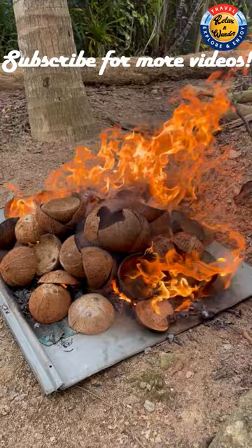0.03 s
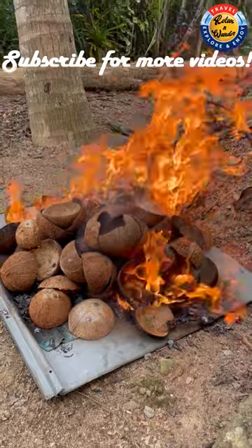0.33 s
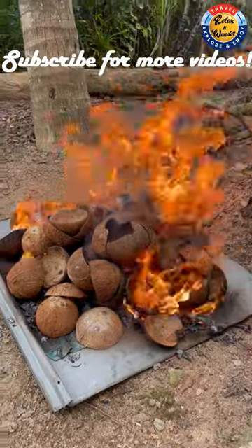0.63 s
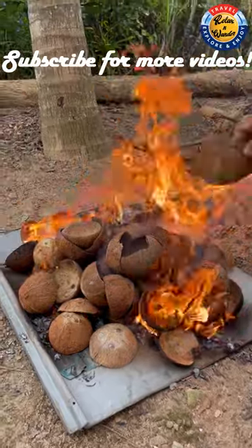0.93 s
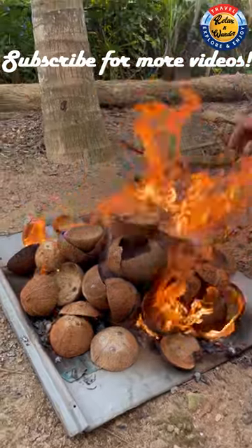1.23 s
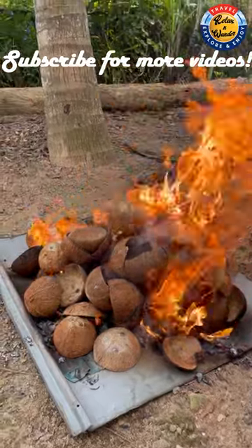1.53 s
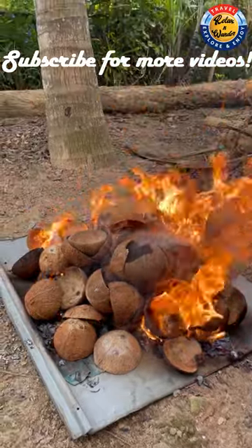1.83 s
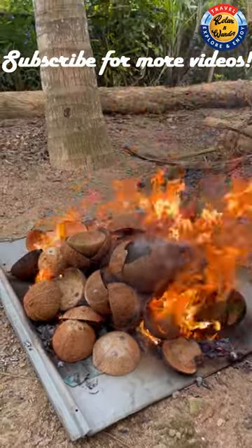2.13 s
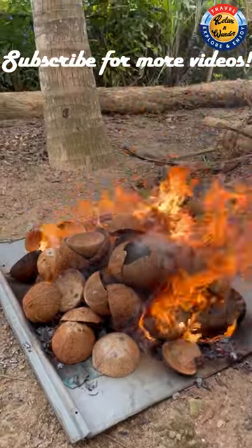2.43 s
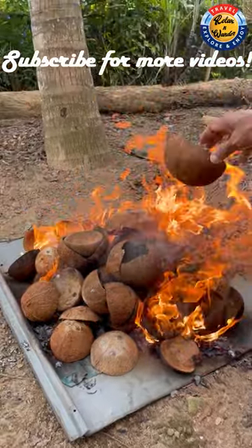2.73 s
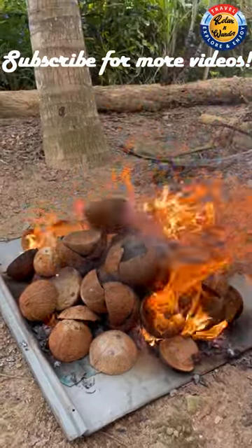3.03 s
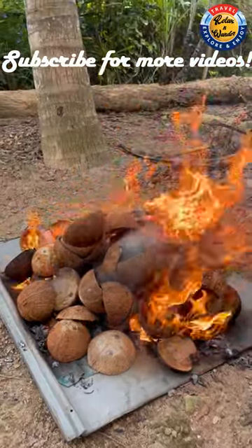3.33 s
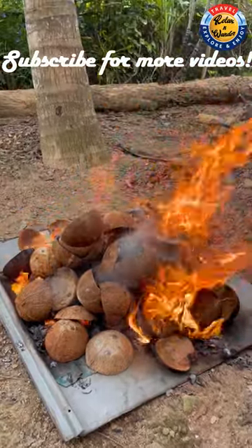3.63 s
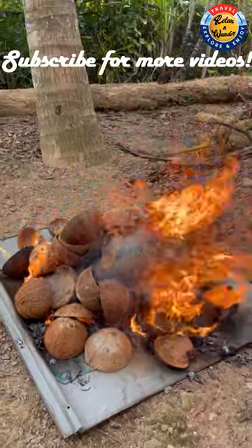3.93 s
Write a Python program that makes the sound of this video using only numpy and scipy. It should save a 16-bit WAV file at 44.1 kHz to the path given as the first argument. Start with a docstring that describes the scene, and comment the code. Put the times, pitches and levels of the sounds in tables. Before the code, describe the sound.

A close outdoor fire rumbles, rushes and crackles for four seconds, with scattered sharp pops. Steam spits briefly around 0.7 seconds. At 1.2 seconds a thrown coconut shell lands with a loud hollow clack and a crunch of embers, settling with dull knocks near 1.6. A second clacks down at 2.9 and knocks again at 3.1. The flames gradually swell, rushing strongest around 3.5 seconds.

```python
"""Coconut shell fire

A heap of coconut shells burns outdoors, close by. Turbulent gas rumbles, rushes and hisses; fibres
crackle, steam spits and pockets of gas pop the hot shells open. Two more half shells are thrown on:
each lands with a hollow clack, crunches the embers and tumbles into place with duller knocking."""
import sys
import numpy as np
from scipy import signal
from scipy.fft import rfft, irfft
from scipy.io import wavfile
from scipy.ndimage import uniform_filter1d

SR = 44100
rng = np.random.default_rng(int(sys.argv[2]) if len(sys.argv) > 2 else 0)


def put_to_file(sound):
    """Save the sound as 16-bit audio at rate SR, in the file named by the first command-line argument."""
    columns = np.atleast_2d(sound).T  # one column per channel
    safe = np.clip(columns, -1, 1)
    whole_steps = np.round(safe * 32767)
    wavfile.write(sys.argv[1], SR, whole_steps.astype(np.int16))


N = 176400


def undb(db):
    """Decibels to gain."""
    return 10 ** (np.asarray(db) / 20)


def unit(x):
    """Scale to rms 1."""
    return x / np.sqrt(np.mean(x ** 2))


def curve(points):
    """Read (freq_hz, value) points at every frequency of the spectrum."""
    hz, value = np.array(points, float).T
    bins_hz = np.arange(N // 2 + 1) * SR / N
    return np.interp(np.log(bins_hz + 1), np.log(hz), value)


def colour(x, points):
    """EQ a sound with (freq_hz, gain_db) points."""
    return irfft(rfft(x) * undb(curve(points)), N)


def band(x, low_hz, high_hz, order):
    """Causal band-pass."""
    return signal.sosfilt(signal.butter(order, [low_hz, high_hz], "band", fs=SR, output="sos"), x)


def wander(rate_hz):
    """Smooth random drift with rms 1."""
    hold = int(SR / rate_hz)
    steps = np.repeat(rng.standard_normal(N // hold + 1), hold)
    return unit(uniform_filter1d(uniform_filter1d(steps, hold), hold)[:N])


def chatter(samples, depth_db=2.8, rate_hz=700):
    """A fast, uneven flutter of level, with rms 1."""
    return unit(undb(depth_db * wander(rate_hz)[:samples]))


def burst(low_hz, high_hz, decay_s, order=2):
    """A fracture: a burst of noise that builds up quickly and dies fast."""
    t = np.arange(SR // 20) / SR
    attack_s = 0.58 * decay_s
    envelope = np.exp(-t / decay_s) * (1 - np.exp(-t / attack_s))
    noise = band(rng.standard_normal(len(t)) * envelope, low_hz, high_hz, order)
    return noise * np.sqrt(decay_s * SR / 2 / np.sum(noise ** 2))


def add(out, start_s, sound):
    """Mix a sound in at a time."""
    i = int(start_s * SR)
    out[i:i + len(sound)] += sound[:N - i]


# Tone of the reflections from ground and trees: freq_hz, gain_db
SCATTER_EQ = [(200, -12), (700, -12.5), (2000, -10.5), (6000, -7), (15000, -19)]


def yard(x, scatter_t60_s=0.098, tail_t60_s=0.98, tail_db=-22.5):
    """Add a quick stereo scatter off the ground and heap, then a faint tail from the trees."""
    t = np.arange(N) / SR
    fade = undb(-60 * t / scatter_t60_s) + undb(tail_db - 60 * t / tail_t60_s)
    mid, side = colour(rng.standard_normal((2, N)), SCATTER_EQ) * fade / np.sqrt(np.sum(fade ** 2))
    echo = mid + .5 * side * np.array([[1], [-1]])
    return x + signal.fftconvolve(x[None], echo, axes=1)[:, :N]


# Swell of the five flame layers, before trim: time_s, rumble_db, roar_db, rush_db, flare_db, sizzle_db
FLAME_SWELL = [(0.06, -43.5, -48, -60, -69, -65.5), (0.52, -39, -48.5, -58.5, -64.5, -60),
               (0.85, -42.5, -49.5, -63.5, -69.5, -65), (1.1, -38, -51, -60, -64.5, -59.5),
               (1.48, -43, -48, -59.5, -72, -61), (1.61, -40.5, -45.5, -56, -61, -57),
               (1.67, -40, -40, -51.5, -62.5, -61), (1.95, -39.5, -44.5, -56.5, -63, -57.5),
               (2.27, -38.5, -43.5, -52, -59.5, -57), (2.42, -39, -42.5, -50, -58.5, -55.5),
               (3.0, -38.5, -41.5, -48.5, -56.5, -58), (3.31, -37, -45, -52.5, -59, -57.5),
               (3.36, -42, -40, -46, -55, -59), (3.49, -34, -42, -43.5, -53.5, -59.5),
               (3.55, -37.5, -41, -50, -61, -60), (3.87, -36.5, -42.5, -49.5, -65.5, -62.5),
               (4.0, -36.5, -47.5, -49, -60.5, -63.5)]
# The layers, rumble to sizzle: low_hz, high_hz, trim_db, flutter_db, flutter_hz, stereo_width
FLAME_LAYERS = [(25, 256, 1, 1.5, 14, 0.02), (260, 875, 1, 2, 25, 0.24), (920, 2490, 1.5, 2.03, 35, 0.23),
                (2510, 4360, 1, 0.3, 50, 0.69), (4960, 15400, -0.5, 0.5, 30, 0)]
# Bass-heavy tone of the noise each layer is cut from: freq_hz, gain_db
FLAME_EQ = [(25, -16), (40, -15), (58, 1.5), (160, -2.5), (220, -4.5), (295, -9.5), (450, -7.5),
            (690, -17.5), (1120, -17.5), (1240, -22.5), (1400, -19), (1750, -20.5), (2900, -26.5),
            (4100, -28.5), (4900, -31), (6400, -34), (10000, -35), (15500, -40)]


def flames():
    """Turbulent burning gas: five noise bands swell with the fire, each with its own flutter."""
    t, swell, out = np.arange(N) / SR, np.array(FLAME_SWELL), 0
    for k, (low_hz, high_hz, trim_db, flutter_db, flutter_hz, width) in enumerate(FLAME_LAYERS):
        noises = colour(rng.standard_normal((2, N)), FLAME_EQ)
        mid, side = (unit(band(noise, low_hz, high_hz, order=4)) for noise in noises)
        level = undb(np.interp(t, swell[:, 0], swell[:, k + 1]) + trim_db)
        flutter = unit(undb(flutter_db * wander(flutter_hz)))
        out = out + level * flutter * (mid + width * side * np.array([[1], [-1]]))
    return out


def crackle(ticks_per_s=200, low_hz=2240, high_hz=13600, floor_db=-55, mean_decay_s=.0006):
    """Fibres snap at random: many tiny ticks, a few stronger, each with its own pitch."""
    out, t = np.zeros(N), np.arange(SR // 200) / SR
    for when, size, pitch, length in rng.random((int(ticks_per_s * N / SR), 4)):
        pitch_hz = low_hz + pitch * (high_hz - low_hz)
        accent_db = min(-4.2 * np.log(size), 14)  # loud ticks are rare
        grain = np.sin(2 * np.pi * pitch_hz * t) + 0.41 * rng.standard_normal(len(t))
        envelope = np.exp(-t / (mean_decay_s * (.5 + length)))
        add(out, when * N / SR, undb(floor_db + accent_db) * grain * envelope)
    return out


# One quick run of steam spurts: start_s, level_db
STEAM_SPURTS = [(0.661, -45), (0.6996, -36), (0.7098, -47), (0.7193, -36), (0.7664, -37), (0.773, -38),
                (0.7871, -42)]


def steam():
    """Steam spits from a split shell in short, ragged spurts."""
    out = np.zeros(N)
    for start_s, level_db in STEAM_SPURTS:
        spurt = burst(low_hz=2260, high_hz=3830, decay_s=0.0025, order=1)
        add(out, start_s, undb(level_db) * spurt * chatter(len(spurt)))
    return out


# Pop cues, levels before trim: start_s, body_db, snap_db, fizz_db, body_pitch_hz
SHELL_POPS = [(0.176, -50, -55.5, -61, 1700), (0.2555, -57, -54.5, -56, 1800),
              (0.31, -59, -48.5, -54, 2000), (0.4084, -39.5, -44.5, -49, 1300),
              (0.4417, -48, -49, -57, 1800), (0.7892, -39, -53, -54, 1100),
              (0.9404, -51, -51.5, -54.5, 1800), (1.0516, -32.5, -42.5, -56, 1750),
              (1.2555, -34.5, -44, -51, 1500), (1.334, -42.5, -53, -55, 1100),
              (1.5482, -49, -46, -49, 1220), (1.6945, -45.5, -40.5, -45, 3040),
              (2.018, -44, -46, -61, 1310), (2.1547, -60, -47, -51, 1800), (2.2, -55, -48.5, -51, 1470),
              (2.225, -61, -51, -48, 1800), (2.3452, -39.5, -43, -44, 1180), (2.361, -56, -62, -42, 1450),
              (2.603, -50, -68, -52, 1530), (2.7133, -50, -42.5, -44, 1380), (2.7501, -57, -44, -51, 1800),
              (2.948, -40, -56, -47, 1710), (3.017, -40, -50, -57, 3430), (3.0589, -34, -38, -42, 2410),
              (3.291, -59, -45, -58, 1960), (3.6414, -32.5, -40.5, -63, 1260),
              (3.6697, -44.5, -45, -55, 1390), (3.7643, -33, -37, -35.5, 1760),
              (3.9775, -36.5, -50.5, -62, 1795)]
# The bright layers of a pop, snap then fizz: low_hz, high_hz, decay_s, trim_db
SNAP_AND_FIZZ = [(2930, 8400, 0.002, 6.5), (10300, 18800, 0.00087, 14.5)]


def pops(body_trim_db=4):
    """Pockets of gas split the hot shells, each with its own mix of woody body, snap and fizz."""
    out = np.zeros(N)
    for start_s, body_db, snap_db, fizz_db, pitch_hz in SHELL_POPS:
        body = burst(pitch_hz / np.sqrt(2), pitch_hz * np.sqrt(2), decay_s=.0022)  # an octave wide
        add(out, start_s, undb(body_db + body_trim_db) * body)
        for level_db, (low_hz, high_hz, decay_s, trim_db) in zip((snap_db, fizz_db), SNAP_AND_FIZZ):
            add(out, start_s, undb(level_db + trim_db) * burst(low_hz, high_hz, decay_s))
    return out


# Ember crunch under each landing: start_s, level_db
EMBER_CRUNCHES = [(1.19, -34.5), (2.882, -35)]


def embers(grit_db=1.5, decay_s=0.024):
    """A landing shell crunches the charred pieces under it: a gritty rustle that fades."""
    out, t = np.zeros(N), np.arange(N) / SR
    for start_s, level_db in EMBER_CRUNCHES:
        grit = rng.standard_normal(N) * undb(grit_db * wander(rate_hz=900))
        rustle = unit(band(grit, low_hz=1490, high_hz=7060, order=1))
        add(out, start_s, undb(level_db) * rustle * np.exp(-t / decay_s))
    return out


# Hollow ring of each thrown shell and of the heap they settle on: pitch_hz, relative_db
FIRST_SHELL_MODES = [(306, -10), (450, -12.5), (610, -12), (692, 7.5), (765, 0), (1015, 1.5), (1335, 2),
                     (1565, 6.5), (1820, -25), (2400, 4), (2760, 4), (3480, 4.5), (4130, 11.5)]
SECOND_SHELL_MODES = [(310, -23), (445, 3), (610, -3), (750, 3.5), (850, 1), (1425, -7), (1595, 11.5),
                      (2720, 1), (3850, 0), (4200, 11), (4710, 9), (6250, -5)]
HEAP_MODES = [(530, -9), (790, 5.5), (950, 4.5), (1160, 5), (1310, -0.5)]
# Hits on the heap: start_s, ring_db, crack_db, brightness_hz, body (0 first shell, 1 second, 2 heap)
SHELL_HITS = [(1.1867, -46, -14, 4500, 0), (1.1901, -35, -18.5, 7040, 0), (1.1929, -18.5, -12, 2100, 0),
              (1.1952, -29.5, -10.5, 3430, 0), (1.231, -48, -28, 1400, 0), (1.5698, -31.5, -31, 1200, 2),
              (1.626, -46, -34, 700, 2), (2.8781, -37, -5.5, 6950, 1), (2.8797, -20, -15, 2160, 1),
              (3.119, -34.5, -23.5, 1720, 2)]


def thrown_shells(low_mode_t60_s=(.092, .068, .052), knee_hz=850):
    """Each hit cracks and rings a shell or the heap, chattering on its neighbours; tumbles are duller."""
    out, t = np.zeros(N), np.arange(SR // 4) / SR
    for start_s, ring_db, crack_db, brightness_hz, body in SHELL_HITS:
        ring = np.zeros(len(t))
        for pitch_hz, mode_db in (FIRST_SHELL_MODES, SECOND_SHELL_MODES, HEAP_MODES)[body]:
            t60_s = low_mode_t60_s[body] / np.hypot(1, pitch_hz / knee_hz)  # high modes die sooner
            envelope = undb(mode_db - 60 * t / t60_s) * chatter(len(t))
            rolloff = 1 / np.hypot(1, pitch_hz / brightness_hz)
            ring += rolloff * envelope * np.sin(2 * np.pi * pitch_hz * t)
        crack = burst(low_hz=307, high_hz=brightness_hz, decay_s=0.0016)
        add(out, start_s, undb(ring_db) * band(ring, low_hz=216, high_hz=17000, order=2))
        add(out, start_s, undb(crack_db) * crack)
    return out


def scene():
    """A dry bed of flames, with all the short sounds echoing lightly in the yard."""
    return flames() + yard(crackle() + pops() + steam() + thrown_shells() + embers())


# Stereo tilt between the microphone's two ports: freq_hz, left_minus_right_db
PORT_BALANCE = [(100, 0), (380, 1.5), (720, 9), (1400, 7), (2400, 3), (4400, 1), (8000, -0.5)]
# Phase between the ports: freq_hz, left_lead_rad
PORT_LEAD = [(300, 0), (550, 1.19), (1000, 1.07), (2800, 0.95), (4500, 1.46), (5800, 1), (8000, 2),
             (9000, 3), (10800, 3.5), (13000, 5.5), (15500, 5)]


def record(dry, silence_s=0.058, fade_in_s=0.005, top_hz=16000):
    """Two microphone ports differ in level and phase; sound sets in after a moment, and the top is cut."""
    balance = undb(curve(PORT_BALANCE))
    half_lead = np.exp(.5j * curve(PORT_LEAD))
    ports = np.array([balance * half_lead, 1 / half_lead]) * 2 / (1 + balance)
    heard = np.clip(irfft(rfft(dry) * ports, N), -1, 1)
    fade_in = np.clip((np.arange(N) / SR - silence_s) / fade_in_s, 0, 1)
    high_cut = signal.ellip(8, .2, 70, top_hz, fs=SR, output="sos")
    return signal.sosfilt(high_cut, heard * fade_in)


dry = scene()
out = record(dry)
put_to_file(out)
```